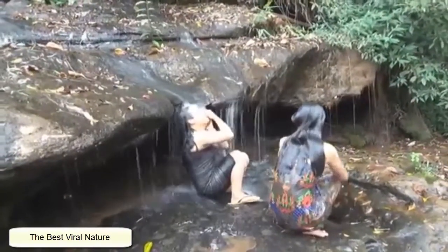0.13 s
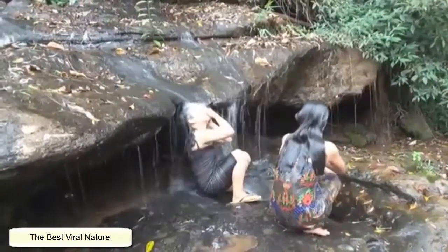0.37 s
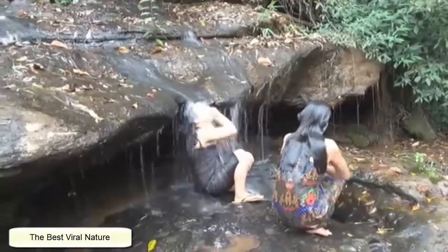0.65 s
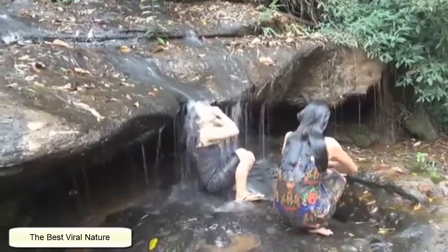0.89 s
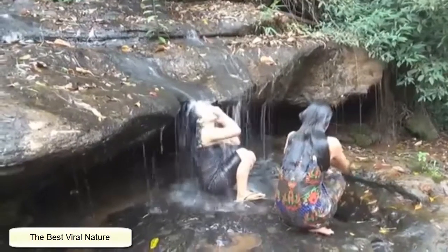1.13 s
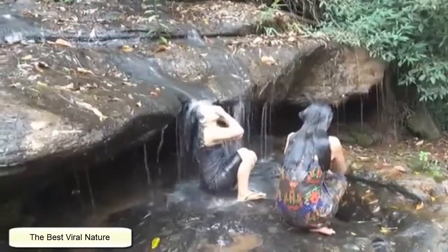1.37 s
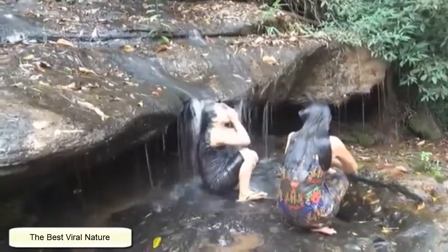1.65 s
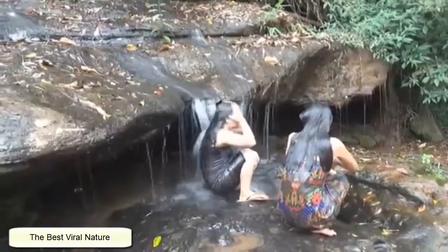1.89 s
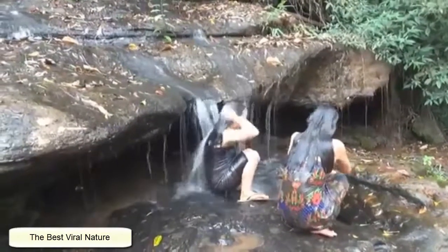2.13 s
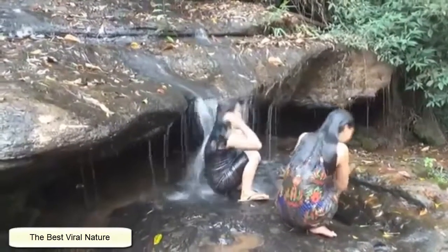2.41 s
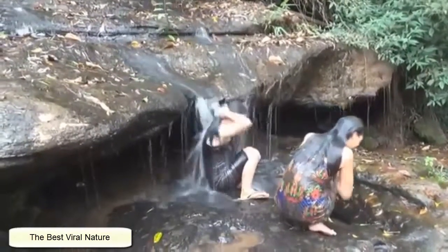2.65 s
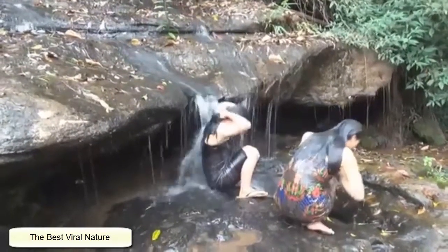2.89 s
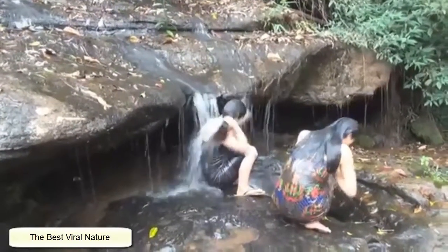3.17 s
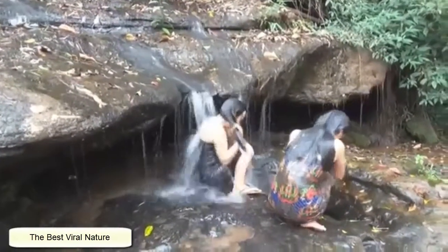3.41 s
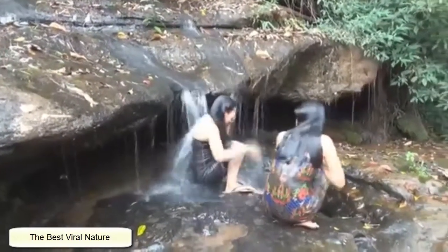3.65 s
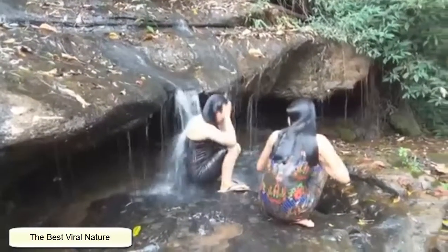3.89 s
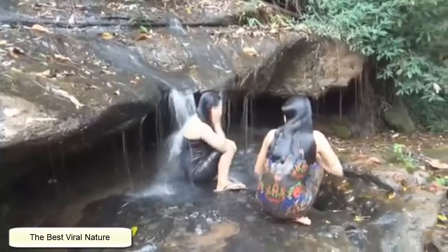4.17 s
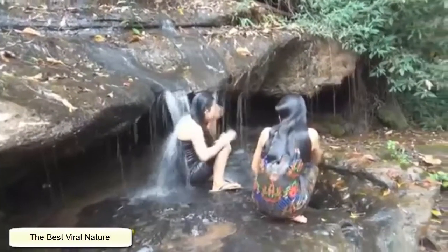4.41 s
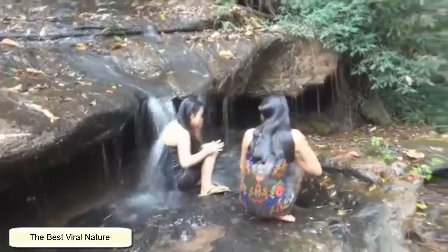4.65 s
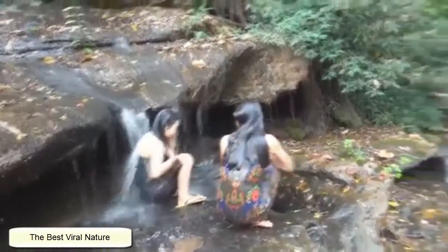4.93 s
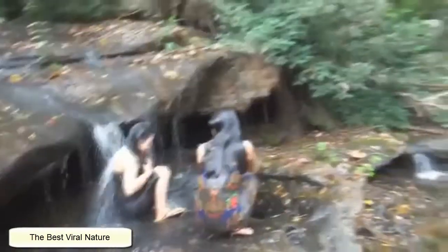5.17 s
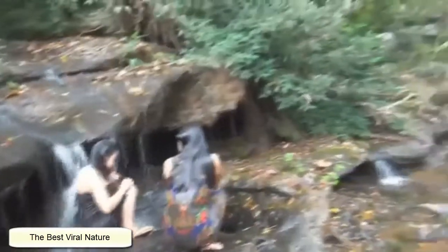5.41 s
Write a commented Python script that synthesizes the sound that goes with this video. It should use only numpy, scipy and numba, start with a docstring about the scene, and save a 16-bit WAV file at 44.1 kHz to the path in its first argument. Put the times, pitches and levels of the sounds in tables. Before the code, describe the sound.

Close, harsh rush of water pouring off a ledge onto wet stone, flickering constantly, with small bubbly plops and splatters throughout.

```python
"""A shallow stony pool under a rock ledge: a small waterfall pours in, a few metres from a handheld camera. The
fall is noise plus swarms of tiny ringing bubbles and ticks, surging and flickering band by band. Big bubbles
plop as single rising notes opened by a spatter of drops; the hollow under the ledge hums faintly as noise
through two narrow resonances. The loudest peaks are clipped flat."""
import sys
import numpy as np
from scipy import signal
from scipy.fft import rfft, irfft, next_fast_len
from scipy.io import wavfile
from scipy.ndimage import uniform_filter1d
from numba import njit

SR = 44100
rng = np.random.default_rng(int(sys.argv[2]) if len(sys.argv) > 2 else 0)


def file_out(sig):
    """Save sig as 16-bit WAV at sys.argv[1]."""
    # one column per channel
    cols = np.atleast_2d(sig).T
    # limit, then scale
    lim = np.clip(cols, -1, 1)
    pcm = np.round(lim * 32767).astype(np.int16)
    wavfile.write(sys.argv[1], SR, pcm)


def attenuation_scalar(level_db):
    """Turn a level in dB into a linear amplitude multiplier (20 dB per decade)."""
    decades = np.asarray(level_db, float) / 20
    return 10 ** decades


N = 244402
TIME = np.arange(N) / SR


def curves(table):
    """Columns of a table as sample-rate curves."""
    s, *columns = np.transpose(table)
    return [np.interp(TIME, s, column) for column in columns]


def bumps(rows, width_s):
    """Bell-shaped humps of given height at given times, summed."""
    return sum(height * np.exp(-0.5 * ((TIME - s) / width_s) ** 2) for s, height in rows)


def level(x, db):
    """Scale to an rms level."""
    return x * attenuation_scalar(db) / np.sqrt(np.mean(x ** 2))


def walk(rate):
    """Random levels held 1 / rate s and slewed twice; spread 1."""
    hold = int(SR / rate)
    steps = np.repeat(rng.standard_normal(N // hold + 1), hold)
    wander = uniform_filter1d(uniform_filter1d(steps, hold), hold)[:N]
    return wander / wander.std()


def colour(x, points):
    """Shape a spectrum by (frequency [Hz], gain [dB]) points."""
    size = next_fast_len(N)
    hz, db = np.transpose(points)
    bin_hz = np.arange(1, size // 2 + 2) * SR / size
    gain = attenuation_scalar(np.interp(np.log(bin_hz), np.log(hz), db))
    return irfft(rfft(x, size) * gain, size)[..., :N]


def bands(x, centres_hz):
    """Split into neighbouring bands with soft overlaps that sum to the whole."""
    size = next_fast_len(N)
    spectrum = rfft(x, size)
    log_hz = np.log(np.arange(1, size // 2 + 2) * SR / size)
    for one_band in np.eye(len(centres_hz)):
        weight = np.interp(log_hz, np.log(centres_hz), one_band)
        yield irfft(spectrum * weight, size)[..., :N]


@njit
def ring(n, start, hz, cycles, rise, size, side, onset):
    """Bubbles: each swells in, rings for some cycles and rises in pitch as it nears the surface."""
    out = np.zeros((2, n))  # mid, side
    for j in range(len(hz)):
        life = cycles[j] * SR / hz[j]  # decay time in samples
        turn = np.exp(2j * np.pi * hz[j] / SR - 1 / life)
        glide = np.exp(2j * np.pi * hz[j] / SR * rise[j] / life)
        z, swell, grow = size[j] + 0j, 1., np.exp(-1 / (onset * life))
        for i in range(start[j], min(n, start[j] + int(4 * life) + 1)):
            z *= turn
            turn *= glide
            swell *= grow
            out[0, i] += z.imag * (1 - swell)
            out[1, i] += z.imag * (1 - swell) * side[j]
    return out


# the flow and its extra swing below the splash from plunging into the pool rather than spraying off rock;
# only swings about the mean count: (time [s], flow [dB], plunge share [dB])
FLOW = [(0.0, -10.5, -9.5), (0.09, -9, -13), (0.63, -10, -12), (1.83, -9, -14.5), (2.84, -9, -12.5),
        (3.39, -9, -15), (5.26, -9.5, -12.5), (5.54, -11, -11)]
# the stream is broken for a moment: (time [s], level change [dB])
LULLS = [(.66, -2), (.82, -0.5), (1.05, -3.5), (1.69, -5.5), (1.735, -2), (4.61, -1.5), (4.97, -2.5)]
# slugs of water slap the pool, heard in the mid splash: (time [s], lift [dB])
SLUGS = [(.15, -0.5), (.6, 2), (.875, 5.5), (.9, 0), (1.04, 1.5), (1.21, 4), (1.29, 1.5), (1.48, 5.5),
         (2.05, 5), (2.2, 3), (2.29, 4.5), (2.91, 2), (4.5, 2), (4.7, 0.5), (5.2, 1), (5.3, 2)]
LULL_S, SLUG_S = 0.0085, 0.0074  # bell width of each
RUMBLE_HZ, SPLASH_HZ, SPRAY_HZ = 170, 1500, 5000  # where each range ends or begins
RUMBLE_WANDER_DB = 3
SPLASH_FOLLOWS = 0.51  # how much of the plunge's swing the mid splash shares
PAN_START_DB, PAN_DRIFT_DB_PER_S = 0.2, 0.23  # left minus right as the camera drifts
SWING_FROM_S, SWING_DB_PER_S = 4.3, 1  # then it swings away to the right


def fall():
    """The falling water in third-octave bands that surge with the flow and flicker alone."""
    flow_db, plunge_db = curves(FLOW)
    spray_db = flow_db + bumps(LULLS, LULL_S)
    splash_db = SPLASH_FOLLOWS * plunge_db + bumps(SLUGS, SLUG_S)
    swing_db = SWING_DB_PER_S * np.maximum(TIME - SWING_FROM_S, 0)
    pan_db = PAN_START_DB + PAN_DRIFT_DB_PER_S * TIME + swing_db
    lean = np.tanh(pan_db * np.log(10) / 40)  # side over mid giving that left-right difference
    rumble_db = RUMBLE_WANDER_DB * walk(9)
    # slugs of water and the quick patter of their landing, shared by neighbouring bands, in dB
    gush = [0.7 * walk(15) + 0.5 * walk(90) for _ in range(4)]
    centres_hz = 40 * 2 ** np.arange(0, 9, 1 / 3)
    out = 0
    for k, (hz, band) in enumerate(zip(centres_hz, bands(water(), centres_hz))):
        if hz <= RUMBLE_HZ:
            surge_db = rumble_db
        elif hz < SPLASH_HZ:
            surge_db = spray_db + plunge_db
        elif hz < SPRAY_HZ:
            surge_db = spray_db + splash_db
        else:
            surge_db = spray_db
        below, blend = divmod(k / 9, 1)  # crossfade to the next gush over nine bands
        shared_db = (1 - blend) * gush[int(below)] + blend * gush[int(below) + 1]
        flicker_db = (-0.24 + hz / 21000) * walk(15)
        mid, side = band * attenuation_scalar(surge_db - surge_db.mean() + shared_db + flicker_db)
        # splashes land now left, now right; only the short waves lean as the camera swings
        side = side * attenuation_scalar(1.5 * walk(21))
        if hz > SPLASH_HZ:
            side = side + lean * mid
        out = out + np.array([mid, side])
    return out


# falling water as the microphone colours it: (frequency [Hz], relative level [dB per Hz])
WATER = [(18, -56), (50, -26), (110, -18), (165, -16.5), (215, -10), (675, -7.5), (880, -9), (1200, -6.5),
         (1400, -10.5), (2230, -4), (4370, -4.5), (5380, -3), (6970, -5.5), (8800, 0.5), (10300, -2.5),
         (14800, -19.5)]
# what reaches the two ears differently: (frequency [Hz], colour of the side layer [dB])
SPREAD = [(60, -15), (200, -19.5), (400, -17), (700, -14), (1300, -16), (2300, -17), (4200, -15.5),
          (6500, -13.5), (9000, -15.5), (11000, -20.5), (14500, -31)]


def water():
    """Steady water before it surges: smooth noise rush, fizz, longer-ringing bubbles and ticks on rock."""
    rush = attenuation_scalar(-6.5) * rng.standard_normal((2, N))
    fizz = attenuation_scalar(-5.5) * swarm(count=22000, cycles=2.5, rise=0.072, scatter_db=1.0, lasting=0.082)
    bubbles = attenuation_scalar(-6.5) * swarm(count=7000, cycles=14.0, rise=0.031, scatter_db=1.4, lasting=0.76)
    # lone drops on rock
    ticks = attenuation_scalar(-14.5) * swarm(count=1500, cycles=0.9, rise=0.014, scatter_db=2.0, lasting=0.14)
    mid, side = colour(rush + fizz + bubbles + ticks, WATER)
    return level(np.array([mid, colour(side, SPREAD)]), -12.0)


def swarm(count, cycles, rise, scatter_db, lasting):
    """Countless small bubbles, mid and side; rare large sizes stand out of the crowd."""
    when, pitch, rarity, length, lift, place = rng.random((count, 6)).T
    start = (when * N).astype(np.int64)
    hz = 60 + 15000 * pitch
    # small bubbles ring more cycles; equal energy keeps the crowd white
    life = cycles * (0.5 + length) * (hz / 1000) ** lasting
    size = np.sqrt(hz / life) * attenuation_scalar(-scatter_db * np.log(1 - rarity))
    side = 6.47 * (place - 0.5)
    return level(ring(N, start, hz, life, rise * lift, size, side, 0.16), 0)


# big bubbles and splats: (time near the peak [s], pitch [Hz], level before the swell-in [dB])
PLOPS = [(0.062, 1140, -11), (0.101, 1460, -11), (0.15, 4000, 1), (0.155, 1000, -11), (0.397, 2540, -6),
         (0.403, 1160, -9.5), (0.429, 785, -11.5), (0.468, 1020, -7), (0.468, 2020, -4.5),
         (0.596, 1599, -2), (0.6, 1260, -13), (0.729, 2560, -1), (0.895, 696, -13), (0.895, 3470, 0),
         (1.47, 4760, -2), (1.481, 2920, 2.5), (2.122, 659, -11.5), (2.197, 1243, -7.5), (2.505, 2550, 1.5),
         (2.697, 615, -9), (2.72, 690, -18), (2.769, 690, -13.5), (2.778, 1340, -11), (2.876, 670, -16),
         (2.893, 1290, -10), (3.627, 4177, -1), (4.052, 4140, 4), (4.267, 392, -19.5), (4.267, 716, -11),
         (4.284, 2800, -1), (4.786, 1330, -11), (4.847, 3080, -1), (5.021, 482, -15.5), (5.062, 933, -10),
         (5.301, 2400, -7), (5.462, 680, -17)]
PLOP_CYCLES, PLOP_CYCLES_SLOPE = 8.2, -0.4  # cycles rung at 1 kHz; higher splats ring fewer
PLOP_RISE = 0.1  # pitch rise per ring time


def plops():
    """The big bubbles with a rising note, each opened by a spatter of drops from the slap that trapped it."""
    s, hz, db = np.transpose(PLOPS)
    place, delay, pitch = rng.random((len(s), 3, 8)).transpose(1, 0, 2)  # eight drops a plop
    side = 0.5 * (place - 0.5)
    cycles = PLOP_CYCLES * (hz / 1000) ** PLOP_CYCLES_SLOPE
    rise = np.full(len(s), PLOP_RISE)
    start_s = np.maximum(s - 0.448 * cycles / hz, 0)
    start = (start_s * SR).astype(np.int64)
    note = ring(N, start, hz * (1 - 0.68 * rise), cycles, rise, attenuation_scalar(db), side[:, 0], 0.35)
    drop_at = ((start_s[:, None] + 0.0064 * delay ** 2) * SR).astype(np.int64).ravel()
    drop_hz = np.minimum(hz[:, None] * (0.684 + 1.4 * pitch), 15000).ravel()
    drop_size = np.repeat(attenuation_scalar(db - 6.5), 8)
    same = np.ones(len(drop_hz))
    spatter = ring(N, drop_at, drop_hz, 3.1 * same, 0.05 * same, drop_size, side.ravel(), 0.48)
    return note + spatter


# air modes under the ledge: (frequency [Hz], width of each filter pass [Hz], resting level [dB])
HOLLOW_MODES = [(93.6, 7, -55.5), (200, 25, -52.5)]
# swells added to the hum, the low mode's list, then the upper's:
# (middle [s], length, two bell widths [s], added level at the peak [dB])
HUM_SWELLS = [
    [(.79, .06, -50), (2.05, .08, -48.5), (2.84, 0.11, -46), (3.13, 0.25, -43), (3.75, 0.11, -55),
     (4.39, 0.21, -41)],
    [(.41, 0.041, -35.5), (1.35, .05, -30.5), (3.24, .15, -36), (4.295, .05, -29.5), (5.25, 0.19, -34),
     (5.39, 0.055, -39)],
]
HUM_WANDER_DB = 2.5


def hollow():
    """The roar, as noise, excites two narrow air modes under the ledge; they waver and now and then swell."""
    out = 0
    for (hz, width, rest_db), swells in zip(HOLLOW_MODES, HUM_SWELLS):
        b, a = signal.iirpeak(hz, hz / width, fs=SR)
        roar = rng.standard_normal(N)
        air = signal.lfilter(b, a, signal.lfilter(b, a, roar))
        swell = sum(bumps([(s, attenuation_scalar(db))], length / 2) for s, length, db in swells)
        rest = attenuation_scalar(rest_db + HUM_WANDER_DB * walk(11))
        out = out + level(air, 0) * (rest + swell)
    return np.array([out, 0.14 * out])


def scene():
    """Sum the layers and turn mid and side into left and right."""
    mid, side = fall() + plops() + hollow()
    return np.array([mid + side, mid - side])


def narrow(x, fold_db):
    """The width flickers: every short slice of a band whose left-right difference is faint folds to mono."""
    mid, side = (x[0] + x[1]) / 2, (x[0] - x[1]) / 2
    _, _, (m, s) = signal.stft(np.array([mid, side]), window="cosine", nperseg=2048)
    # bands that widen with frequency, as bin numbers
    edges = np.unique(np.minimum(4 * np.arange(60) ** 1.5 // 2, len(m) - 1).astype(int))
    power_m = np.add.reduceat(abs(m) ** 2, edges)
    power_s = np.add.reduceat(abs(s) ** 2, edges)
    wide = power_s > power_m * attenuation_scalar(fold_db) ** 2
    keep = np.repeat(wide, np.diff(np.append(edges, len(m))), axis=0)
    side = signal.istft(s * keep, window="cosine", nperseg=2048)[1][:N]
    return np.array([mid + side, mid - side])


def roll_off(x):
    """The treble ends steeply here."""
    return signal.sosfilt(signal.butter(12, 14940, fs=SR, output="sos"), x)


CEILING = 0.96  # of full scale


def record(dry):
    """The peaks are clipped flat at the ceiling; faint width drops out."""
    clipped = np.clip(dry, -CEILING, CEILING)
    mix = narrow(clipped, fold_db=-12.0)
    return roll_off(mix)


dry = scene()
out = record(dry)
file_out(out)
```